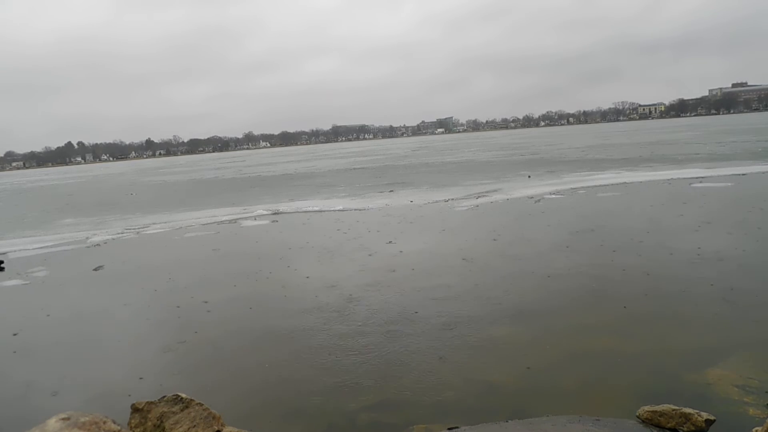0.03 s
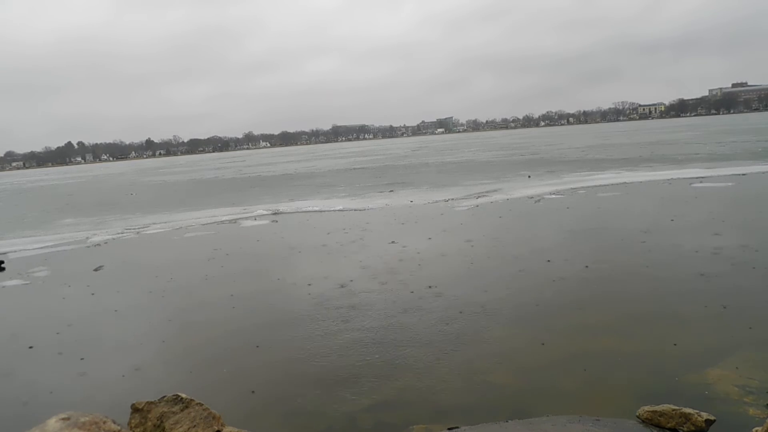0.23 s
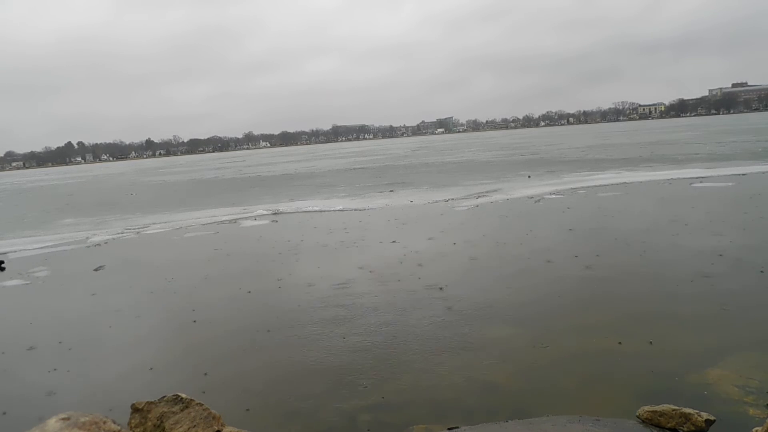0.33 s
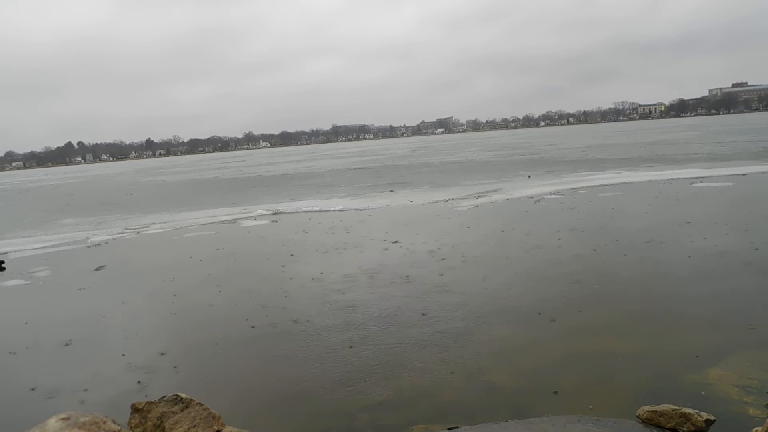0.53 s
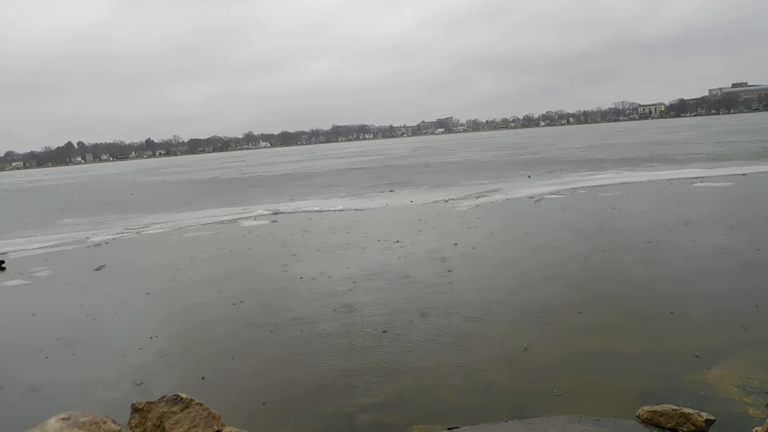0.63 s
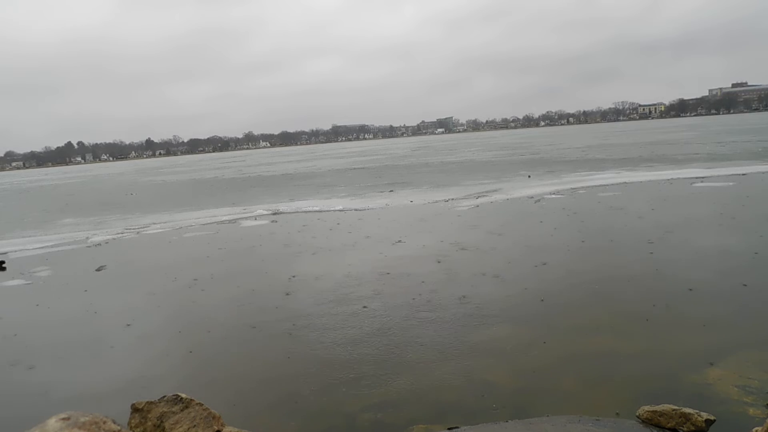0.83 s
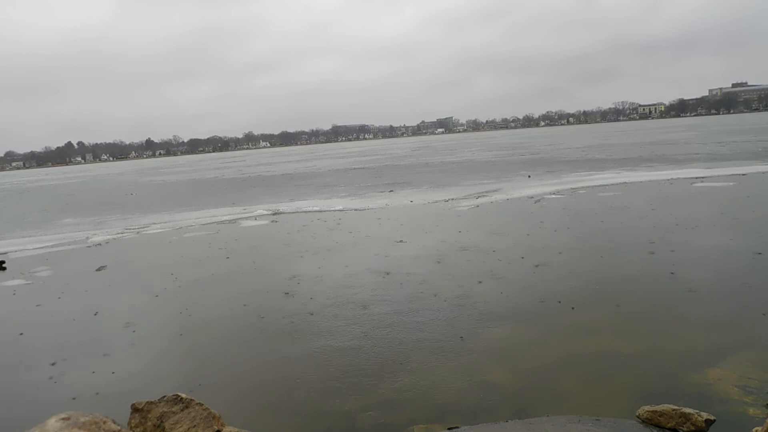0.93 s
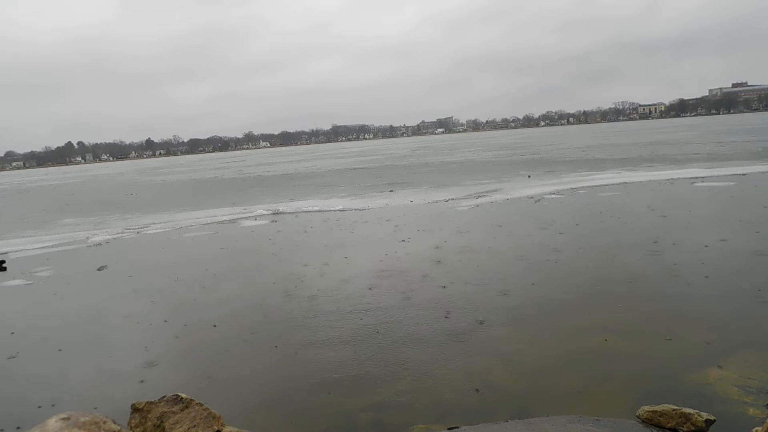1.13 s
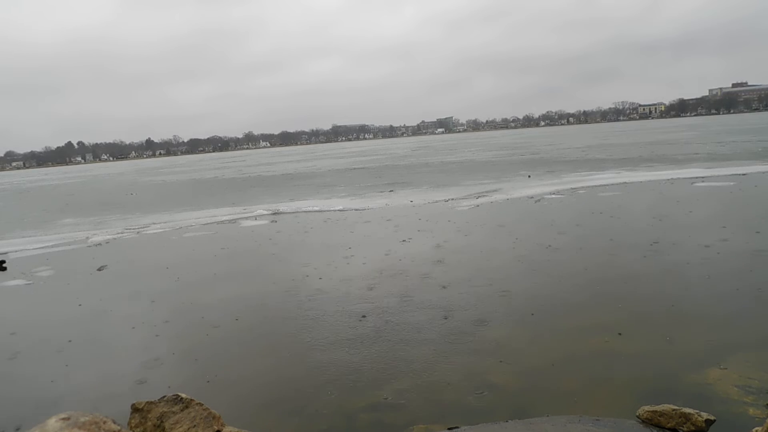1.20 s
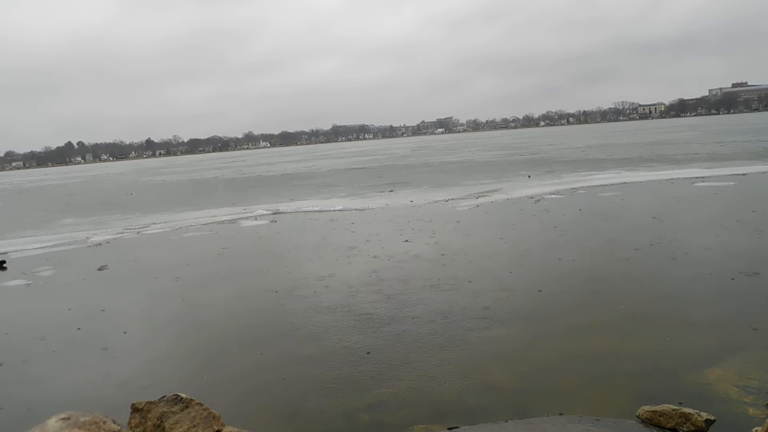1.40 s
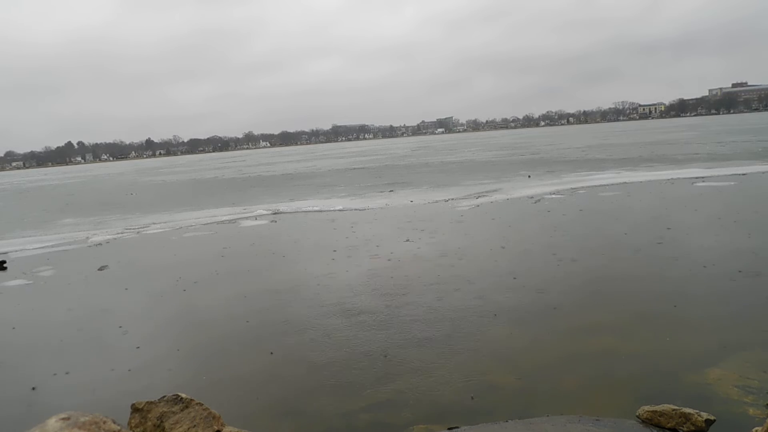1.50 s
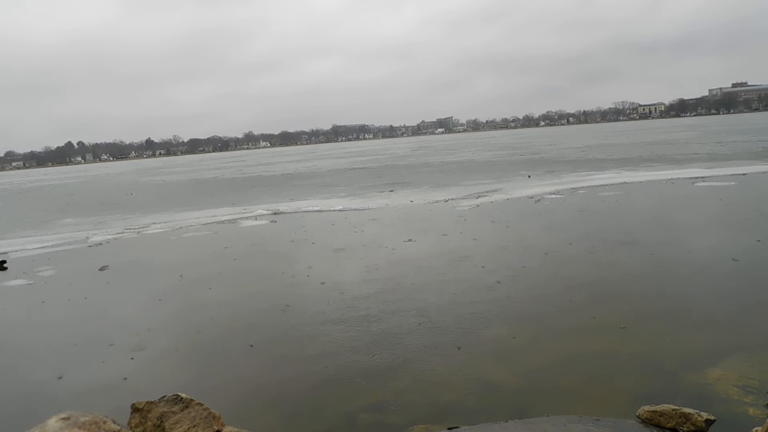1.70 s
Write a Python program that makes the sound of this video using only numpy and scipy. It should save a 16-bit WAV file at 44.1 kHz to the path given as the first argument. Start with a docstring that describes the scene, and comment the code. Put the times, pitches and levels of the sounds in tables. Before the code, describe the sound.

Hard, close knock cracking against a frozen lake, followed by a tap and two duller knocks.

```python
"""The stony shore of a frozen lake. Wind and town make a steady far rush, and thin ice ticks and crackles.
Almost at once a hard double knock cracks out close by, with a short gritty scrape: the struck slab
rings and the rocks throw the sound back. A light tap follows, then two duller knocks about a second
after the first. Two microphones a few centimetres apart hear the knocks from the right."""
import sys
import numpy as np
from scipy import signal
from scipy.fft import rfft, irfft
from scipy.io import wavfile

SR = 44100
rng = np.random.default_rng(int(sys.argv[2]) if len(sys.argv) > 2 else 0)


def generate_wav(sig):
    """Save sig (samples, or channels by samples) to the path in sys.argv[1] as 16-bit PCM at SR."""
    pcm = np.round(np.clip(np.atleast_2d(sig).T, -1, 1) * 32767).astype(np.int16)
    wavfile.write(sys.argv[1], SR, pcm)


N = 77175   # 1.75 seconds
HIT_SAMPLES = 2048
CUTOFF_HZ = 16050
LEFT_LATE_S = 0.00011   # sound from the right reaches the left microphone this much later


def from_db(db):
    """Turn decibels into a number to multiply by."""
    return 10 ** (np.asarray(db) / 20)


def rms_one(x):
    """Scale a sound so its average strength (root mean square) is 1."""
    return x / np.sqrt(np.mean(x ** 2) + 1e-20)


def peak_one(x):
    """Scale a sound so its biggest swing is 1."""
    return x / np.abs(x).max()


def in_time(rows):
    """Join rows of (time_s, value) with straight lines, one value a sample."""
    return np.interp(np.arange(N) / SR, *np.transpose(rows))


def over_hz(rows):
    """Join rows of (pitch_hz, value) into a curve over the whole spectrum."""
    hz, value = np.transpose(rows)
    return np.interp(np.log(np.fft.rfftfreq(N, 1 / SR) + 1e-9), np.log(hz), value)


def drift(rate_hz):
    """A slow random wander, about 1 in size."""
    r = np.exp(-2 * np.pi * rate_hz / SR)
    return rms_one(signal.lfilter([1], [1, -2 * r, r * r], rng.standard_normal(2 * N))[N:])


def dull(x, top_hz):
    """Take away the treble."""
    return signal.sosfilt(signal.butter(2, top_hz, fs=SR, output="sos"), x)


def resonate(x, hz, q):
    """Make a sound ring at one pitch; a higher q rings longer."""
    r = np.exp(-np.pi * hz / q / SR)
    feedback = [1, -2 * r * np.cos(2 * np.pi * hz / SR), r * r]
    return signal.lfilter(np.array([1, 0, -1]) * (1 - r * r) / 2, feedback, x + 1e-18)


def pulse(hz, q):
    """One click that rings very briefly at a pitch."""
    return peak_one(resonate(resonate(signal.unit_impulse(HIT_SAMPLES), hz, q), hz, q))


def snap(top_hz, low_hz=3600):
    """The sharp start of a brittle hit."""
    band = signal.butter(2, [low_hz, np.clip(top_hz, 2 * low_hz, CUTOFF_HZ)], "band", fs=SR, output="sos")
    return peak_one(signal.sosfilt(band, signal.unit_impulse(HIT_SAMPLES)))


def add(out, start_s, sound, pan_db):
    """Put a short sound into the stereo track; pan_db above 0 is louder on the left."""
    i = int(start_s * SR)
    out[:, i:i + len(sound)] += from_db([[pan_db / 2], [-pan_db / 2]]) * sound[:N - i]


def left_late(x, lag_s):
    """Delay the left side; a lag below 0 makes it early."""
    delay = np.exp(-2j * np.pi * np.fft.rfftfreq(N, 1 / SR) * lag_s)
    return np.array([irfft(rfft(x[0]) * delay, N), x[1]])


def microphone_pair(x):
    """Sound from all around is alike on both microphones in the bass, less so in most of the treble."""
    # How alike the sides are (1 the same, 0 unrelated, below 0 opposed): pitch_hz, likeness
    likeness = [(30, 1), (130, 1), (300, 0.96), (650, 0.84), (1400, 0.44), (2200, -0.23), (3200, -0.4),
                (4500, -0.23), (7000, 0.087), (15000, 1)]
    alike = np.clip(over_hz(likeness), -1, 1)
    mid, side = rfft(x)
    return irfft(np.sqrt((1 + alike) / 2) * mid + np.sqrt((1 - alike) / 2) * side * [[1], [-1]], N)


def scatter(x, fade_s):
    """Many random echoes, different on each side, that fall by 60 dB in fade_s."""
    t = np.arange(N) / SR
    echoes = rng.standard_normal((2, N)) * np.exp(-np.log(1000) * t / fade_s)
    return signal.fftconvolve(x, rms_one(echoes) / np.sqrt(N), axes=1)[:, :N]


def random_clicks(shape, per_s, spread_db, cap):
    """Clicks at random times, most small, a few up to cap * spread_db louder."""
    happens = rng.random(shape) < per_s / SR
    sizes = from_db(spread_db * np.minimum(rng.exponential(1, shape), cap))
    return happens * sizes * rng.choice([-1, 1], shape)


def far_rush():
    """Wind and town across the lake blur into smooth noise that wavers slightly."""
    # The tone of the rush: pitch_hz, relative_db
    tone = [(20, -16), (50, -7.5), (110, -5), (180, -10.5), (300, -5.5), (480, -5), (630, 0), (800, 1.5),
            (1100, -1), (1900, -4), (2600, -10.5), (4000, -20.5), (6500, -27.5), (11000, -36), (16000, -30)]
    # How much louder it is on the left: pitch_hz, pan_db
    balance = [(100, -0.5), (1500, 0.5), (4000, -1.5), (9000, -4.5), (15000, -3)]
    # The loudness it wavers around: time_s, level_db
    loudness = [(0, -43), (.35, -42), (.65, -44), (1.2, -44), (1.75, -43)]
    spectrum = rfft(microphone_pair(rng.standard_normal((2, N))))
    air = irfft(spectrum * from_db(over_hz(tone) + over_hz(balance) * [[.5], [-.5]]), N)
    waver_db = 0.86 * drift(rate_hz=18.4)
    return from_db(in_time(loudness) + waver_db) * rms_one(left_late(air, lag_s=-0.000019))


def wind(level_db=-73.5, gust_db=10):
    """Soft gusts blow on each microphone and make a faint lumpy rumble."""
    # The tone of the rumble: pitch_hz, relative_db
    tone = [(20, 1), (55, -2), (120, -7.5), (250, -11), (600, -46), (2000, -70)]
    rumble = irfft(rfft(rng.standard_normal((2, N))) * from_db(over_hz(tone)), N)
    return from_db(level_db) * rms_one(rumble * from_db(gust_db * drift(rate_hz=8.9)))


def ice_crackle(pitch_count=12):
    """Thin ice gives off faint pings at random times and pitches."""
    # How loud the crackle is: time_s, level_db
    loudness = [(0, -60.5), (.3, -71.5), (.8, -68.5), (1.05, -71), (1.3, -70.5), (1.75, -79)]
    clicks = random_clicks(N, per_s=310, spread_db=4, cap=4)
    which_pitch = rng.integers(0, pitch_count, N)
    clicks = clicks * rng.uniform(0.44, 1, (2, N))   # a different strength on each side
    pitches_hz = np.geomspace(3440, 10800, pitch_count)
    pings = sum(resonate(clicks * (which_pitch == k), hz, q=6.6) for k, hz in enumerate(pitches_hz))
    return from_db(in_time(loudness)) * rms_one(left_late(pings, LEFT_LATE_S))


def ice_ticks():
    """Thin ice snaps: each high tick is over in a millisecond or two and leaves a tiny echo."""
    # Single ticks in the ice: start_s, level_db, pitch_hz, pan_db
    ticks = [(0.0725, -46.5, 6700, -15), (0.1855, -44, 3600, -13), (0.2173, -48, 4000, -4),
             (.2522, -35, 3470, -8), (.2599, -42, 9000, 4), (0.3166, -41.5, 7440, -7),
             (.4400, -45.5, 6700, -7), (0.7238, -38.5, 9100, -9), (0.7523, -38.5, 4300, -2),
             (0.7967, -37, 4630, 6), (0.843, -50, 4000, -6), (0.9068, -46.5, 5800, -6),
             (1.0944, -32, 8900, 6), (1.1809, -43.5, 4040, 8), (1.2975, -39.5, 7040, -4),
             (1.5358, -36, 8900, -8), (1.6684, -44.5, 3620, -10)]
    out = np.zeros((2, N))
    for start_s, level_db, pitch_hz, pan_db in ticks:
        tick = pulse(pitch_hz, q=1.75) + from_db(0.5) * snap(top_hz=7600)
        add(out, start_s, from_db(level_db) * tick, pan_db)
    return out + from_db(-2.5) * scatter(out, fade_s=0.017)


def grit_scrape():
    """Grit rubs in a stream of tiny uneven grains, loudest during the double knock."""
    # How loud the rubbing is: time_s, level_db
    loudness = [(0, -54.5), (.11, -54.5), (.155, -47), (.198, -56), (.212, -33), (.225, -40.5),
                (.24, -30.5), (.256, -53), (.272, -89), (.62, -57), (1.0, -76), (1.27, -62), (1.31, -51.5),
                (1.35, -64), (1.455, -73), (1.478, -46), (1.51, -60), (1.75, -82)]
    # The tone of the grains: pitch_hz, relative_db
    tone = [(60, -39), (300, 14), (850, -17.5), (1900, 5), (3000, -6.5), (4500, -5), (9000, -14),
            (16000, -26)]
    clicks = random_clicks((2, N), per_s=5500, spread_db=3, cap=5)
    grains = irfft(rfft(clicks) * from_db(over_hz(tone)), N)
    return from_db(in_time(loudness)) * rms_one(microphone_pair(grains))


def shore_echoes(hits):
    """Nearby rocks throw the hits back quickly; a faint dull tail comes from along the shore."""
    rocks = from_db(-7) * dull(scatter(hits, fade_s=0.042), top_hz=4860)
    shore = from_db(-26) * dull(scatter(hits, fade_s=0.46), top_hz=2970)
    return microphone_pair(rocks + shore)


def slab_ring(hits):
    """The struck slab rings briefly at several pitches of its own."""
    # The slab's tones: pitch_hz, gain_db, fade_s (time to fall by 60 dB)
    tones = [(584, -22.5, 0.068), (794, -35.5, 0.1), (984, -32, 0.085), (1240, -45, 0.072),
             (1100, -23.5, 0.049), (1407, -38.5, 0.059), (1636, -25, 0.015), (2222, -25.5, 0.019),
             (2520, -54, 0.08), (3077, -49, 0.15), (3784, -20, 0.017)]
    ring = 0
    for pitch_hz, gain_db, fade_s in tones:
        r = np.exp(-np.log(1000) / (fade_s * SR))
        angle = 2 * np.pi * pitch_hz / SR
        tone = signal.lfilter([0, np.sin(angle) ** 2], [1, -2 * r * np.cos(angle), r * r], hits + 1e-18)
        ring = ring + from_db(gain_db) * tone
    return ring


def knocks():
    """A knock is a quick run of hard hits, each a short pulse with a sharp snap and a low thud."""
    # Hits on the slab: start_s, level_db, pitch_hz, snap_db, thud_db, pan_db
    # (snap_db and thud_db count from level_db)
    contacts = [(.1230, -35, 820, -11, -8, -11), (.1515, -36, 1600, -8, -25, -11),
                (.2088, -13.5, 1450, -14, -35, -2), (.2100, -14, 3100, -1, -35, -3),
                (.2344, -16, 2500, -8, -36, -4), (.2363, -18, 1500, -22, -36, 0),
                (.2381, -1.8, 2300, -5.5, -29, -1), (.2400, -15, 1700, -20, -34, 3),
                (.2326, -27, 1200, -14, -30, 0), (.2440, -27, 1000, -16, -30, 1),
                (0.8285, -26, 1850, -6, -20, -4.5), (1.3072, -23, 1110, -9, -12.5, -7),
                (1.3186, -30.5, 496, -25, -5.5, 1), (1.3201, -33, 1610, -16, -27, -12),
                (1.334, -34, 1200, -17, -12, 1), (1.4111, -32.5, 1170, -2, -7, -8),
                (1.4721, -28.5, 1100, -30, -27, -8), (1.4762, -24.5, 1090, -16, -28, -10),
                (1.4777, -24, 1220, -34, -11, -2.5), (1.482, -27.5, 637, -11, -17, -3),
                (1.4827, -21, 970, -36, -32, 2.5)]
    hits = np.zeros((2, N))
    thud = pulse(hz=300, q=0.5)   # the push on the ground under each hit
    for start_s, level_db, pitch_hz, snap_db, thud_db, pan_db in contacts:
        body = pulse(pitch_hz, q=1.17) + from_db(thud_db) * thud
        add(hits, start_s, from_db(level_db) * body, pan_db)
        crack = from_db(level_db + snap_db) * snap(top_hz=5.1 * pitch_hz)
        add(hits, start_s, crack, pan_db - 4.5)   # the treble is shaded on the left
    return left_late(hits + slab_ring(hits), LEFT_LATE_S) + shore_echoes(hits)


def scene():
    """Knocks, ticks, crackle and grit in front of the far rush and a light wind."""
    return knocks() + ice_ticks() + ice_crackle() + grit_scrape() + far_rush() + wind()


def record(dry):
    """Clip peaks at full scale, then cut away the very highest treble."""
    low_pass = signal.firwin(511, CUTOFF_HZ, fs=SR, window="blackman")
    return signal.fftconvolve(np.clip(dry, -1, 1), low_pass[None], "same", axes=1)


dry = scene()
out = record(dry)
generate_wav(out)
```